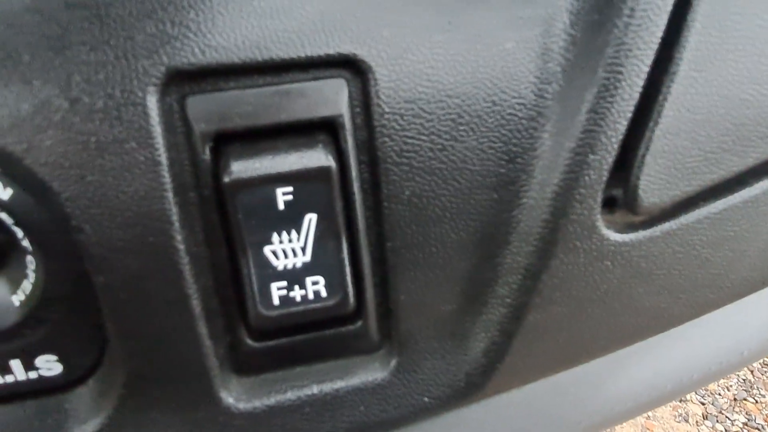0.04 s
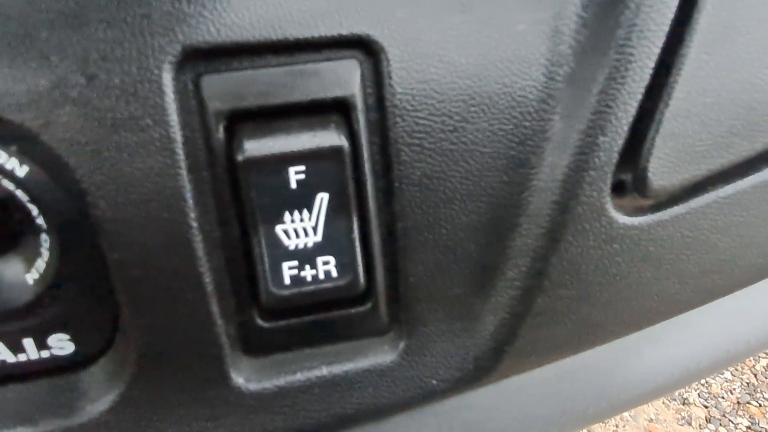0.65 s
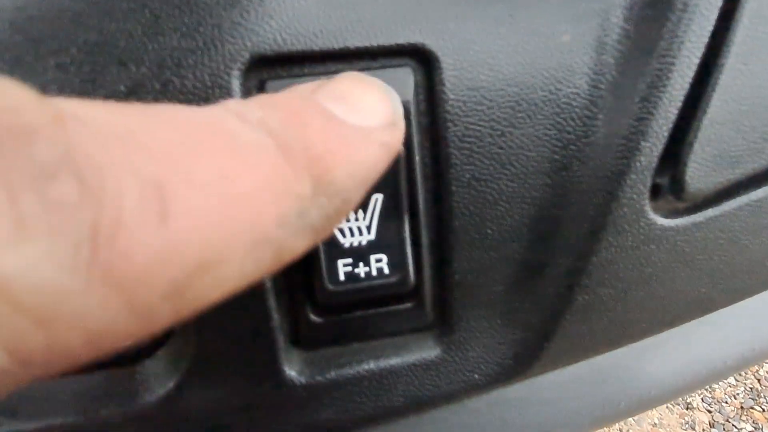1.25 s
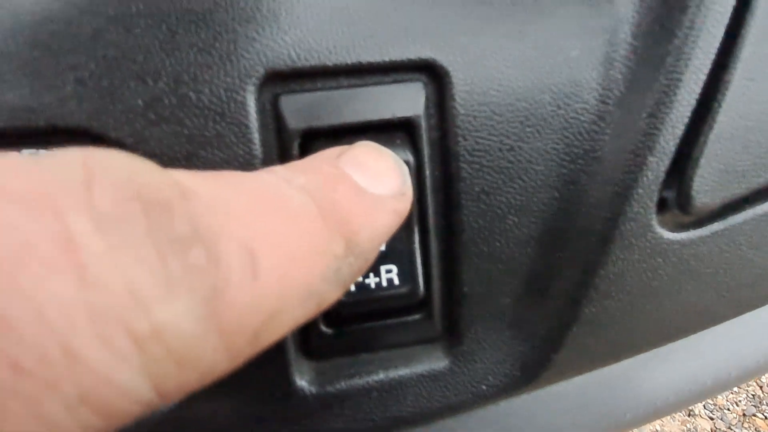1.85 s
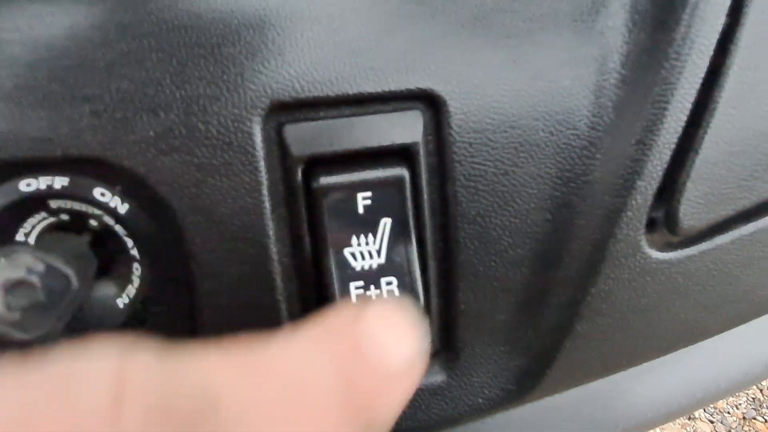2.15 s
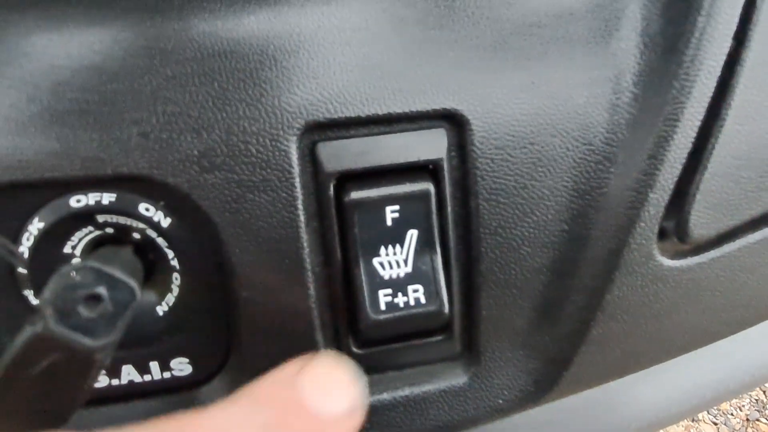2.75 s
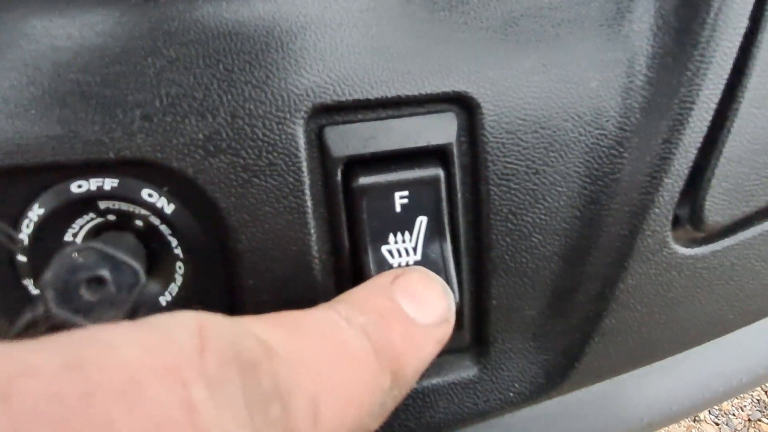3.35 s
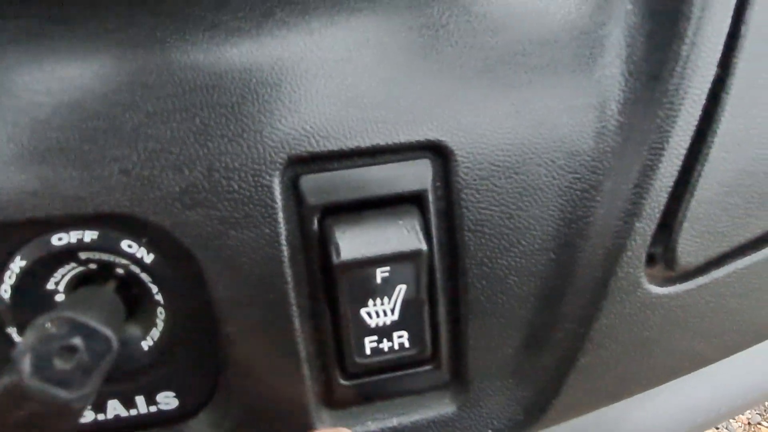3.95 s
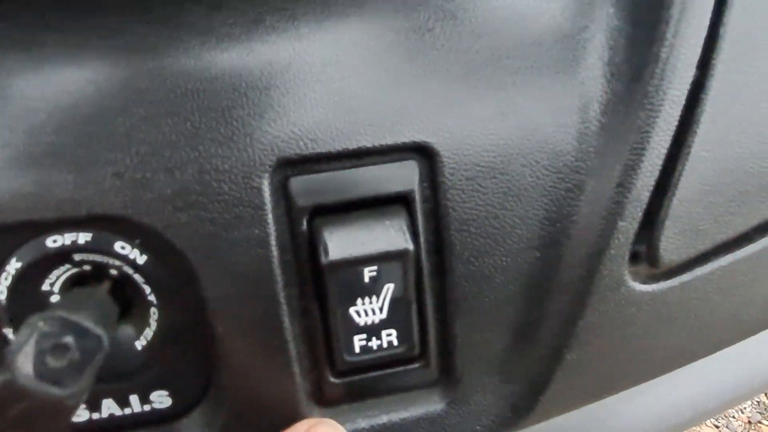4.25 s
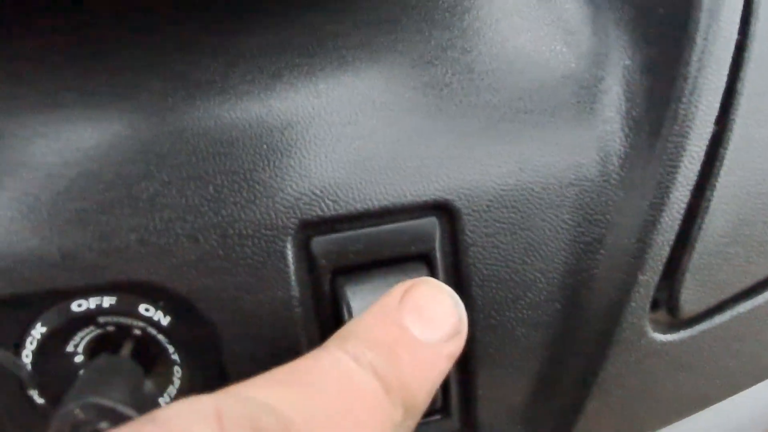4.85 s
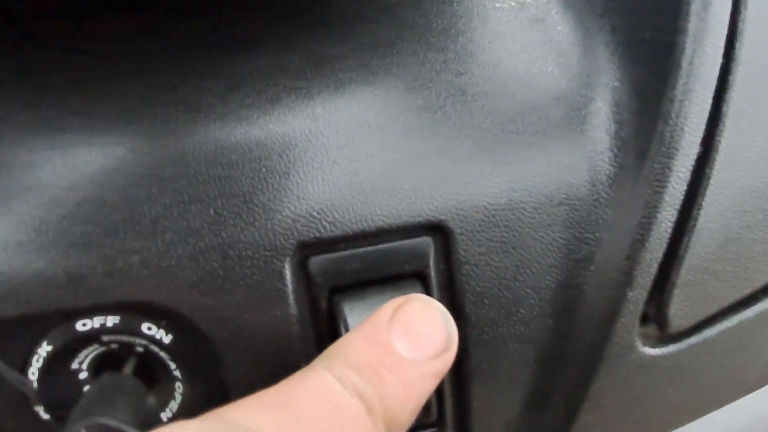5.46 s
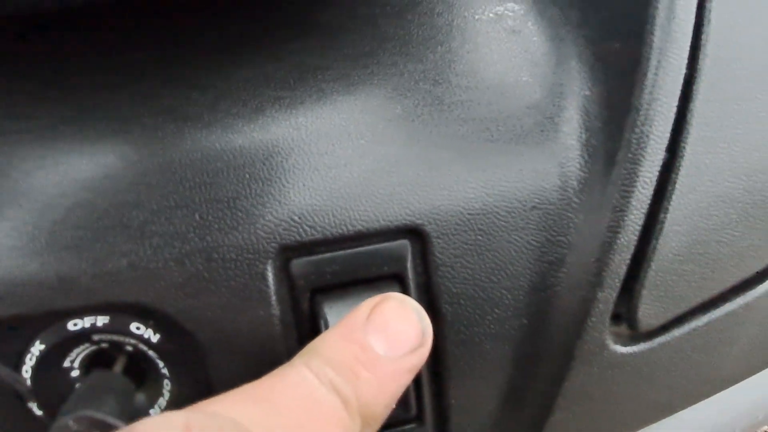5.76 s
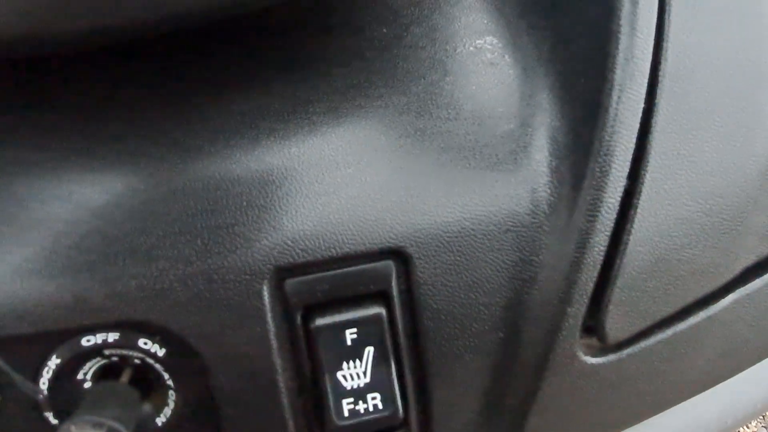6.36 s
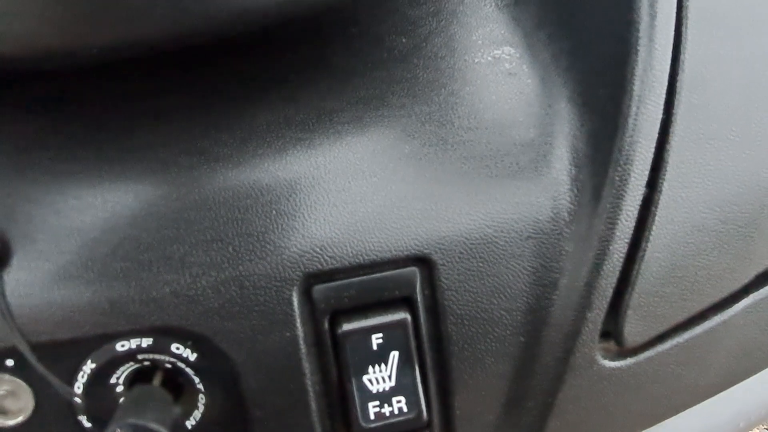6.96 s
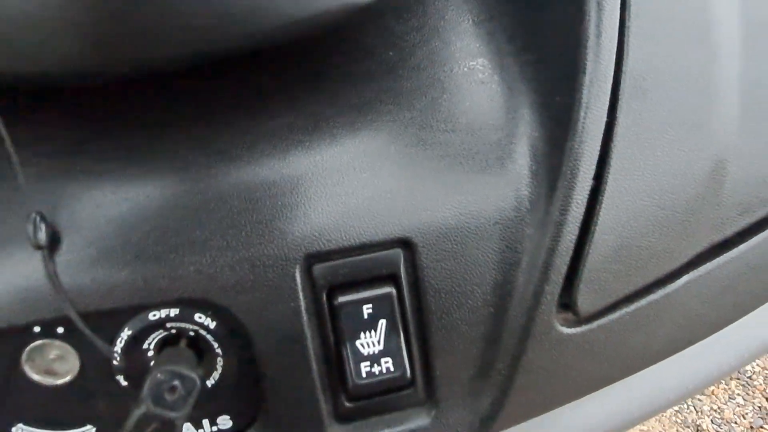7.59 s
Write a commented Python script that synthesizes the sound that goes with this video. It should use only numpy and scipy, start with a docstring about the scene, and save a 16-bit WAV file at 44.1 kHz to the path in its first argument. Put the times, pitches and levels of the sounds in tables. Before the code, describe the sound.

Outdoors, a far-off engine idles as a faint low hum while light puffs of air touch the microphone. Close up, a rocker switch snaps three times with pauses between, each crisp click briefly knocking the hollow plastic panel around it. The finger leaves tiny taps and ticks on the plastic. After the last click, soft low thumps of wind bump the microphone.

```python
"""A plastic rocker switch in a scooter's leg shield, thumbed three times, close up and outdoors.
Each time the rocker scrapes over its detent, snaps against its stop and knocks the hollow panel;
the finger leaves small ticks, and the surroundings give every click a faint tail.
Behind it an engine idles far off, a sleeve brushes softly, and puffs of air bump one microphone
port or the other."""
import sys
import numpy as np
from scipy import signal
from scipy.fft import rfft, irfft, next_fast_len
from scipy.io import wavfile
from scipy.ndimage import map_coordinates

SR = 44100
rng = np.random.default_rng(int(sys.argv[2]) if len(sys.argv) > 2 else 0)


def file_out(sig):
    """Save sig as 16-bit WAV at sys.argv[1]."""
    # one column per channel
    cols = np.atleast_2d(sig).T
    # limit, then scale
    lim = np.clip(cols, -1, 1)
    pcm = np.round(lim * 32767).astype(np.int16)
    wavfile.write(sys.argv[1], SR, pcm)


N = 340788

# stereo image of all noise: f/Hz, left-right correlation
COHERENCE = [(30, 0.95), (60, 0.95), (130, 1), (290, 1), (640, 0.9), (1400, -0.25), (3000, 0.075)]
# fader rides of the bed, ahead of its trims: t/s, engine level/dB, rumble level/dB
BED_RIDE = [(0.0, -57, -65.5), (0.47, -57, -63), (1.68, -63, -65.5), (3.03, -58.5, -65.5), (3.72, -59, -65),
            (4.82, -63, -68), (5.75, -59, -65.5), (6.07, -61, -64.5), (6.54, -64.5, -69),
            (6.93, -58.5, -66), (7.08, -64.5, -68.5), (7.73, -53.5, -62.5)]
# engine harmonics: multiple of the firing rate, level/dB
ENGINE_ORDERS = [(2, -13), (3, -1), (4, -1.5), (5, -11.5), (6, -17.5), (7, -11), (8, -13)]
# fader ride of the breeze, ahead of its trim: t/s, level/dB
BREEZE_RIDE = [(0.0, -57.5), (0.41, -54), (1.68, -65), (2.11, -61), (2.73, -72), (3.25, -63.5), (4.69, -72),
               (6.22, -70), (7.32, -61.5), (7.73, -59)]
# puffs of air: centre t/s, length/s, level/dB, port (1 left, -1 right)
PUFF_CUES = [(.387, 0.06122, -43, 1), (0.481, .13, -46.5, 1), (.871, 0.089, -40, 1),
             (1.123, 0.052, -47.5, -1), (1.318, 0.039, -50, -1), (6.464, 0.03777, -52, -1),
             (6.78, .07, -33, -1), (6.828, 0.026, -34.5, -1), (6.922, 0.038, -39, -1),
             (7.634, 0.04282, -38, -1)]
# sleeve and skin brushing past: centre t/s, length/s, level/dB, centre f/Hz
BRUSH_CUES = [(0.467, 0.18, -76, 960), (0.523, 0.13, -77.5, 5430), (1.04, 0.097, -72.5, 11100),
              (1.759, 0.087, -78, 860), (4.006, 0.099, -78.5, 5150), (6.938, .045, -76.5, 9002),
              (7.461, 0.042, -71, 5558)]
# light touches: t/s, tap level/dB, tap f/Hz, tick level/dB, left over right/dB
TOUCH_CUES = [(.36, -53, 510, -66, -9), (.798, -79.5, 3000, -69, -4), (1.262, -70.5, 1850, -82, 3),
              (2.1, -47.5, 425, -77, 3), (2.147, -65.5, 1660, -67, 4), (3.89, -46.5, 1400, -52, 5),
              (4.683, -51, 1820, -43, 15), (4.708, -50.5, 1680, -48, 8), (4.757, -57.5, 1700, -63, 7),
              (4.822, -63, 1609, -74, 13), (5.059, -64.5, 875, -73, 8), (5.13, -66.5, 800, -80, 0),
              (5.224, -66.5, 800, -85, 0), (6.168, -38.5, 1840, -61, -6), (6.258, -55.5, 1560, -34, 11),
              (6.318, -53.5, 1401, -68, 1)]
# the plunger crosses the detent: t/s, length/s, level/dB
SCRAPE_CUES = [(1.9819, .003, -25), (3.6707, .012, -32), (3.7024, .004, -26), (6.0763, .009, -30)]
# the rocker hits a stop: t/s, blow level/dB, hardness 0-1, knock level/dB, pitch ratio, t60 ratio
SNAP_CUES = [(1.9832, -7.5, .25, -3, 1.086, .75), (1.984, -11.5, 0.91, -21.5, 1.008, 1),
             (3.6717, -11, 0, -0.5, 1.05, 0.6), (3.6779, -18, 0.26, -11, 0.99, .5),
             (3.7053, -7, 1, -18, .95, .38), (6.0768, -9.5, .1, -9, 0.93, 0.62),
             (6.0841, -8, 0.9, -4.5, 1.033, 0.81), (6.112, -26, 0.2, -22, 0.98, .3)]
# brief high pings, at 3.888 s just a faint 5 kHz edge on a tick: t/s, f/Hz, level/dB, t60/s
PING_CUES = [(3.673, 2890, -24, .093), (3.888, 5020, -48, 0.018), (6.116, 6175, -41, 0.0522)]

# noise colours: f/Hz, relative level/dB
RUMBLE_COLOUR = [(15, -32), (28, -17), (48, -3), (100, -8.5), (130, -2), (190, -4), (270, -9.5),
                 (370, -7.5), (480, -16), (800, -27.5), (1370, -31), (3000, -43), (7000, -48),
                 (16000, -56.5)]
HISS_COLOUR = [(2000, -11.5), (9500, -12), (12500, -2), (16000, -7.5)]
WIND_COLOUR = [(15, -28.5), (35, -4), (55, 5), (100, -8), (170, -12), (300, -29), (600, -57.5),
               (2000, -85.5)]
TAIL_COLOUR = [(200, 2), (1500, -1), (3100, -4.5), (4500, -13), (5200, -2), (5900, -16), (12000, -18),
               (16000, -22.5)]
TICK_COLOUR = [(1000, -26), (4000, -21.5), (6100, 13.5), (8500, -16), (12500, -2), (16000, -34)]
CRACK_COLOUR = [(300, -21), (2000, -3), (6000, 0), (8000, -2.5), (12000, -0.5), (16000, -6.5)]
CLATTER_COLOUR = [(80, -21.5), (200, -4.5), (500, -5), (1000, -1.5), (1700, -1), (2400, -7), (3100, -4.5),
                  (4100, -15.5), (5200, -9.5), (6200, -14.5), (16000, -28)]
# tunable noise colours: multiple of the cue's frequency, relative level/dB
BRUSH_COLOUR = [(.25, -22), (1, 0.5), (3, -24), (8, -48)]
SCUFF_COLOUR = [(.1, -10), (.45, -5.5), (.85, 1.5), (1.25, -4), (2.2, -17.5), (4, -31.5), (7, -48),
                (12, -55)]
# EQ of the switch at the right port, which faces away: f/Hz, gain/dB
SHADOW_EQ = [(300, -0.5), (700, 2), (5000, 4.5), (7000, -7.5), (9500, -12.5), (16000, -9.5)]
# damping of the clatter by band: f/Hz, t60/s
CLATTER_DECAY = [(200, 0.22), (600, 0.1), (1500, .075), (3000, 0.053), (6000, 0.043), (12000, 0.025)]

# plastic trim under a light tap: multiple of the tap frequency, level/dB, share of the tap's t60
TRIM_MODES = [(.85, 2.5, 0.96), (1.02, -3.5, 0.83), (1.27, 3, 0.44)]
# modes of the hollow panel, the yielding mount and the rocker: f/Hz, level/dB, t60/s
PANEL_MODES = [(135, -34.5, 0.22), (205, -29, 0.11), (250, -31, 0.039), (314.84, -27.5, 0.075),
               (345, -22.5, .11), (492, -17.5, 0.1), (680, -20, 0.074), (933.29, -25, 0.061),
               (1058.3, -24.5, 0.044), (1208.8, -26.5, 0.058), (1500, -30, .05), (1640, -30.5, 0.04),
               (2196.3, -28, .04)]
MOUNT_MODES = [(239, -11, .028), (610, -20, 0.0067), (1154, -12.5, 0.013)]
ROCKER_LOW_MODES = [(1750, -13, .012), (2450, -7, .005), (2880, -2.5, 0.014), (3400, -2.5, 0.013)]
ROCKER_HIGH_MODES = [(5190, -2.5, .013), (4800, -8, .008)]

HIT_T = np.arange(SR // 3) / SR  # time axis of one hit, t/s
ROCKER_ONSET, PANEL_ONSET = dict(lag_s=.000385, rise_s=.0001), dict(lag_s=.00026, rise_s=.0008)


def amp(db):
    """Decibels to gain."""
    return 10 ** (np.asarray(db) / 20)


def unit(x):
    """Scale to rms 1."""
    return x / np.sqrt(np.mean(x ** 2) + 1e-20)


def along(points, hz):
    """Read (f/Hz, value) points on a log axis."""
    f, v = np.transpose(points)
    return np.interp(np.log(hz + 1), np.log(f + 1), v)


def rides(rows):
    """One fader curve for each column after the time."""
    times, *columns = np.transpose(rows)
    return [np.interp(np.arange(N) / SR, times, column) for column in columns]


def wobble(rate):
    """A smooth random curve, rate knots a second."""
    return map_coordinates(rng.standard_normal(int(N * rate / SR) + 4), [np.arange(N) * rate / SR])


def filtered(x, response):
    """Shape x with a frequency response."""
    n = x.shape[-1]
    padded = next_fast_len(n + 2048)
    return irfft(rfft(x, padded) * response(np.fft.rfftfreq(padded, 1 / SR)), padded)[..., :n]


def noise(colour, size=len(HIT_T)):
    """Stereo noise of rms 1, centred in the bass and wide in the treble."""
    def mid_side(hz):
        width = np.arccos(np.clip(along(COHERENCE, hz), -1, 1)) / 2
        return amp(along(colour, hz)) * [np.cos(width), np.sin(width)]
    mid, side = filtered(rng.standard_normal((2, size)), mid_side)
    return unit(np.array([mid + side, mid - side]))


def swell(colour, length):
    """Noise that fades in for length seconds and out for as long."""
    size = 2 * max(int(length * SR), 2)
    return unit(noise(colour, size + SR // 2)[:, -size:] * np.hanning(size)) / np.sqrt(2)


def pan(db):
    """Stereo gains of mean power 1, left db over right."""
    return unit(amp([[db / 2], [-db / 2]]))


def fade(t60, t=HIT_T):
    """Exponential decay of a struck thing."""
    return np.exp(-np.log(1000) * t / t60)


def ring(modes, lag_s, rise_s, scatter_db, pitch=1, sustain=1):
    """Damped modes of alternating sign, rebalanced on each hit; the right port hears them lag_s later."""
    t = np.maximum(HIT_T - np.array([[0], [lag_s]]), 0)
    out = 0
    for k, (hz, db, t60) in enumerate(modes):
        gain = (-1) ** k * amp(db + scatter_db * rng.standard_normal())
        out += gain * fade(t60 * sustain, t) * np.sin(2 * np.pi * hz * pitch * t)
    return out * (1 - np.exp(-t / rise_s))


def add(track, s, sound):
    """Mix a sound into the track at time s."""
    start = max(round(s * SR), 0)
    track[:, start:start + sound.shape[1]] += sound[:, :max(N - start, 0)]


def idling_bed(firing_hz=44.76, engine_trim_db=-.5, rumble_trim_db=5.5, hiss_db=-84, lead_s=.00047):
    """A far engine idles in outdoor rumble, both reaching the left port first, over a thin even hiss."""
    engine_db, rumble_db = rides(BED_RIDE)
    phase = 2 * np.pi * np.cumsum(firing_hz * (1 + .005 * wobble(rate=3.8))) / SR
    hum = 0
    for order, db in ENGINE_ORDERS:
        drift_db = 1.7 * wobble(rate=12)  # each order wavers by itself on the way
        tone = np.sqrt(2) * np.sin(order * phase + rng.uniform(0, 2 * np.pi))
        hum += amp(engine_db + engine_trim_db + db + drift_db) * tone
    rumble = amp(rumble_db + rumble_trim_db) * noise(RUMBLE_COLOUR, N)
    hiss = amp(hiss_db) * noise(HISS_COLOUR, N)
    advance_s = np.array([[lead_s], [-lead_s]]) / 2
    return filtered(hum + rumble, lambda hz: np.exp(2j * np.pi * hz * advance_s)) + hiss


def wind(trim_db=-.5, swing_db=3, eddies_per_s=14, port_db=30):
    """A low breeze eddies at each port by itself; stronger puffs bump one side."""
    breeze_db, = rides(BREEZE_RIDE)
    eddies = amp(swing_db * np.array([wobble(eddies_per_s), wobble(eddies_per_s)]))
    out = amp(breeze_db + trim_db) * unit(eddies * noise(WIND_COLOUR, N))
    for s, length, db, port in PUFF_CUES:
        add(out, s - length, amp(db) * pan(port * port_db) * swell(WIND_COLOUR, length))
    return out


def sleeve():
    """Cloth and skin brush past in soft swishes."""
    out = np.zeros((2, N))
    for s, length, db, hz in BRUSH_CUES:
        add(out, s - length, amp(db) * swell(np.multiply(BRUSH_COLOUR, [hz, 1]), length))
    return out


def outdoor_tail(clicks, level_db=-37.5, t60=.38):
    """The surroundings scatter each click into a faint diffuse tail that follows its energy."""
    decay = fade(t60) ** 2
    energy = signal.fftconvolve(np.mean(clicks ** 2, axis=0), decay / decay.sum())[:N]
    return amp(level_db) * np.sqrt(np.abs(energy)) * noise(TAIL_COLOUR, N)


def finger_touches(tap_t60=.079, tick_t60=.0087, ring_db=-6):
    """Light contacts: a dull scuff that rings the plastic trim, topped with a sharp tick."""
    out = np.zeros((2, N))
    for s, tap_db, tap_hz, tick_db, side_db in TOUCH_CUES:
        scuff = noise(np.multiply(SCUFF_COLOUR, [tap_hz, 1])) * fade(tap_t60)
        trim = ring(TRIM_MODES, lag_s=.00032, rise_s=.00051, scatter_db=6, pitch=tap_hz, sustain=tap_t60)
        tap = amp(tap_db) * (scuff + amp(ring_db) * trim)
        tick = amp(tick_db) * noise(TICK_COLOUR) * fade(tick_t60)
        add(out, s, pan(side_db) * (tap + tick))
    return out


def ping(hz, t60, choke_s=.046):
    """A brief high ping, right of centre, with its tail choked off."""
    choke = np.exp(-(HIT_T / choke_s) ** 4)
    return pan(-4.5) * ring([(hz, 0, t60)], **PANEL_ONSET, scatter_db=3) * choke


def clatter():
    """The dense upper modes of the plastic trim: noise whose treble dies first."""
    source = noise(CLATTER_COLOUR)
    bands_hz, t60s = np.transpose(CLATTER_DECAY)
    return sum(filtered(source, lambda hz: along(np.c_[bands_hz, band], hz)) * fade(t60)
               for band, t60 in zip(np.eye(len(t60s)), t60s))


def panel_knock(hardness):
    """The body of the click: the hollow panel rings, and a soft contact thuds into the mount."""
    thud_db = np.interp(hardness, [0, 1], [5, -12.5])
    panel = ring(PANEL_MODES, **PANEL_ONSET, scatter_db=3)
    thud = ring(MOUNT_MODES, lag_s=.0001, rise_s=.0006, scatter_db=2.5)
    return panel + amp(thud_db) * pan(2.7) * thud


def rocker_snap(hardness, pitch, sustain, crack_db=-11):
    """The attack of the click: the rocker cracks against its stop, ringing brighter the harder it hits."""
    high_db = np.interp(hardness, [0, 1], [-17.5, 5.5])
    low = ring(ROCKER_LOW_MODES, **ROCKER_ONSET, scatter_db=2.5, pitch=pitch, sustain=sustain)
    high = ring(ROCKER_HIGH_MODES, **ROCKER_ONSET, scatter_db=1.5, pitch=pitch, sustain=sustain)
    crack = noise(CRACK_COLOUR) * fade(t60=.024)
    return low + amp(high_db) * high + amp(crack_db) * crack


def rocker_switch(clatter_db=-13, low_cut_hz=145):
    """Detent scrape, snap and knock from a small panel with little bass, plus brief high pings."""
    out = np.zeros((2, N))
    for s, length, db in SCRAPE_CUES:
        add(out, s, amp(db) * noise(CRACK_COLOUR) * (HIT_T < length))
    for s, blow_db, hardness, knock_db, pitch, sustain in SNAP_CUES:
        snap = rocker_snap(hardness, pitch, sustain)
        knock = panel_knock(hardness)
        add(out, s, amp(blow_db) * (snap + amp(clatter_db) * clatter()) + amp(knock_db) * knock)
    for s, hz, db, t60 in PING_CUES:
        add(out, s, amp(db) * ping(hz, t60))
    left, right = signal.sosfilt(signal.butter(2, low_cut_hz, "highpass", fs=SR, output="sos"), out)
    return np.array([left, filtered(right, lambda hz: amp(along(SHADOW_EQ, hz)))])


def scene():
    """The switch up front, with its tail and the outdoor ambience behind."""
    clicks = rocker_switch() + finger_touches()
    return clicks + outdoor_tail(clicks) + wind() + sleeve() + idling_bed()


def record(dry):
    """A soft clip rounds the loudest snaps near full scale, then a steep high cut ends the band."""
    ceiling, high_cut_hz = .93, 15900
    rounded = dry / (1 + np.abs(dry / ceiling) ** 6) ** (1 / 6)
    return filtered(rounded, lambda hz: 1 / (1 + (hz / high_cut_hz) ** 100))


dry = scene()
out = record(dry)
file_out(out)
```